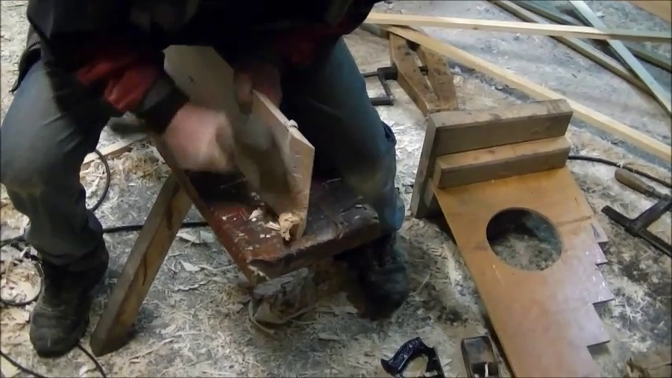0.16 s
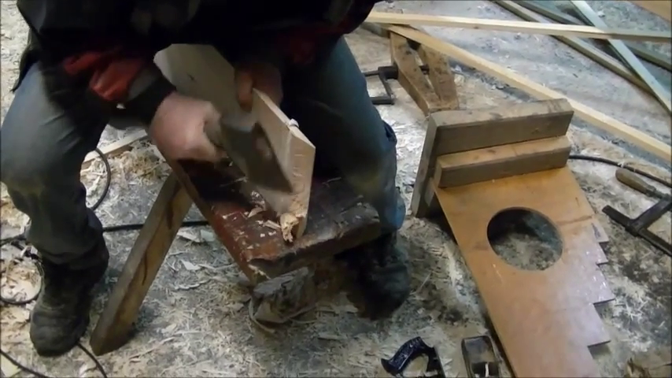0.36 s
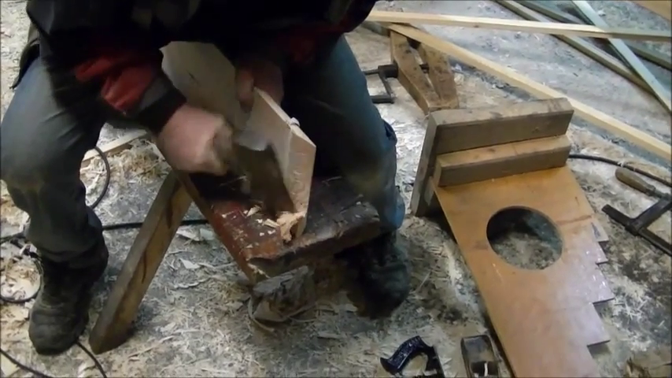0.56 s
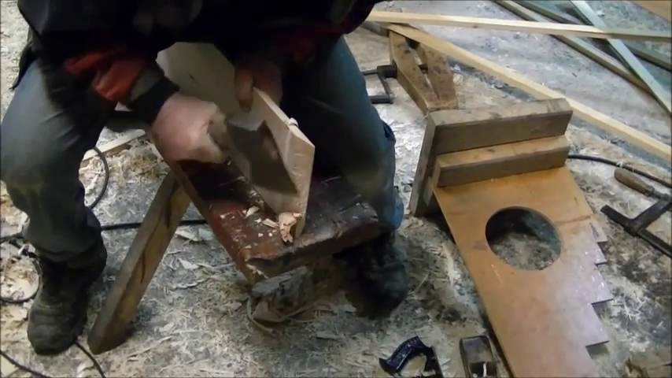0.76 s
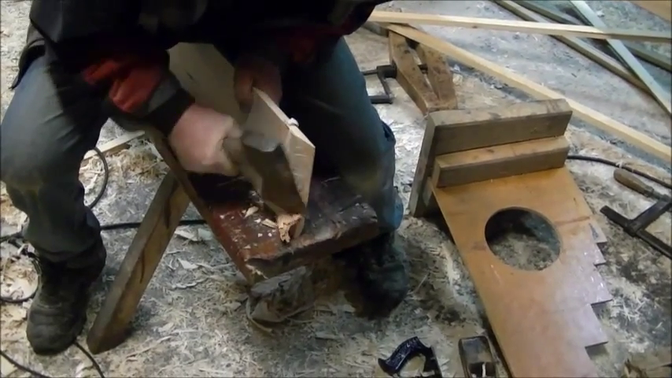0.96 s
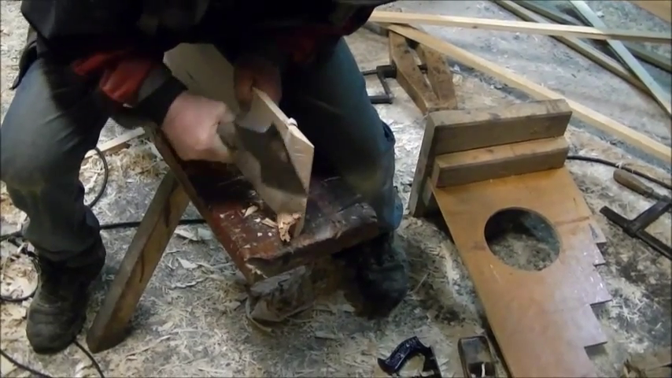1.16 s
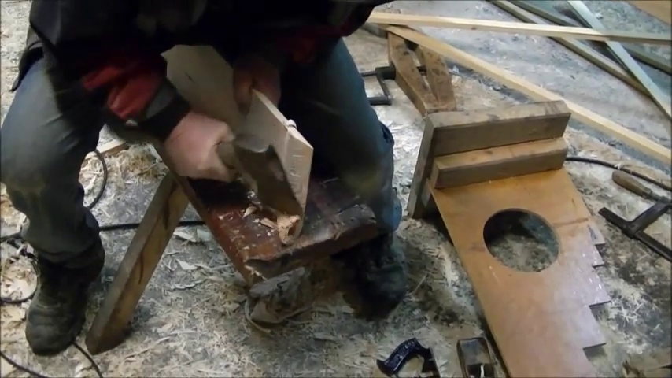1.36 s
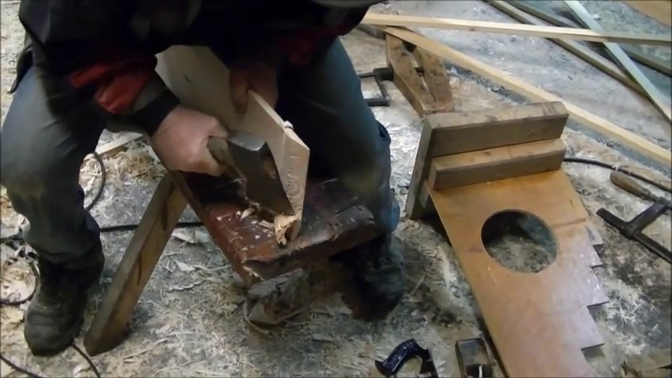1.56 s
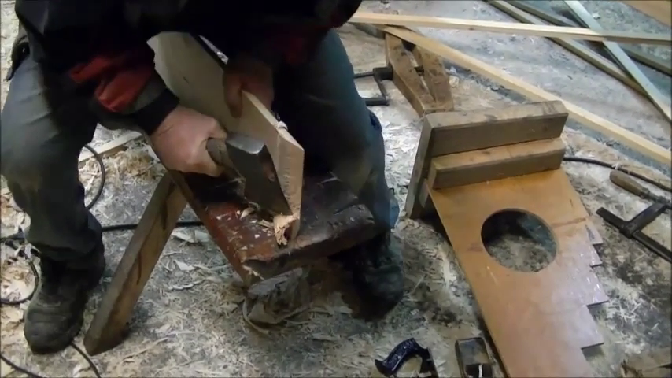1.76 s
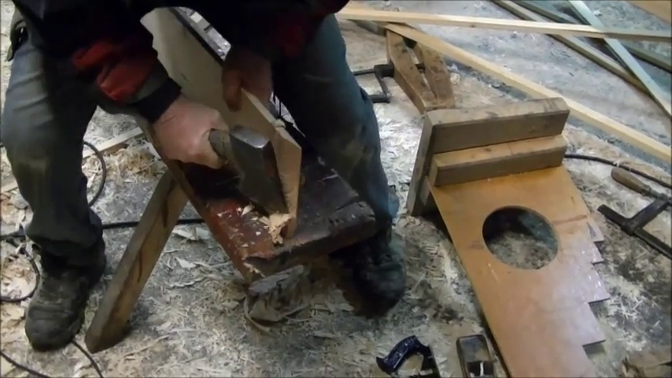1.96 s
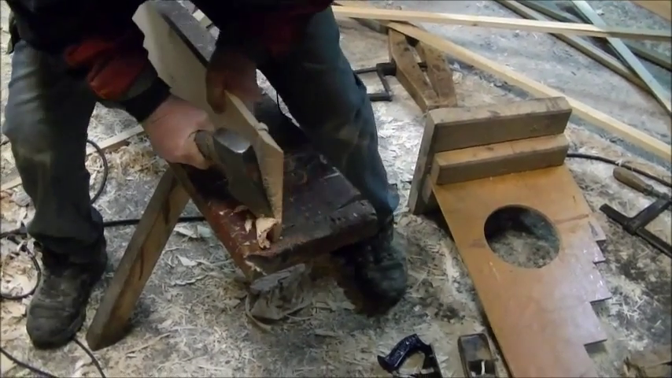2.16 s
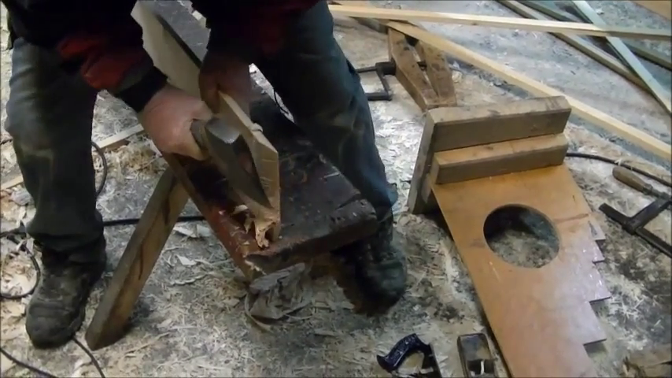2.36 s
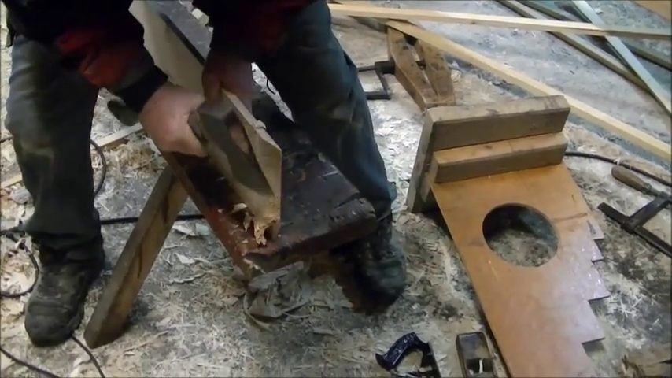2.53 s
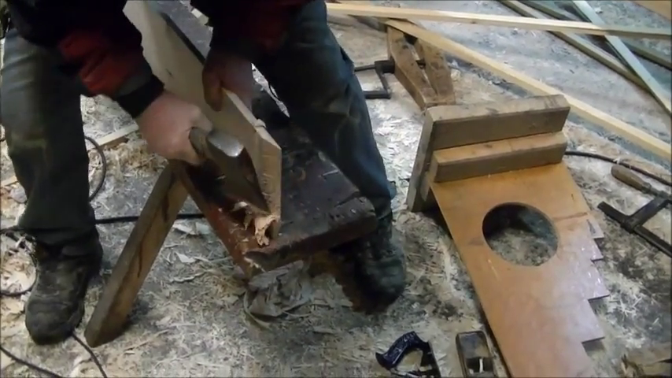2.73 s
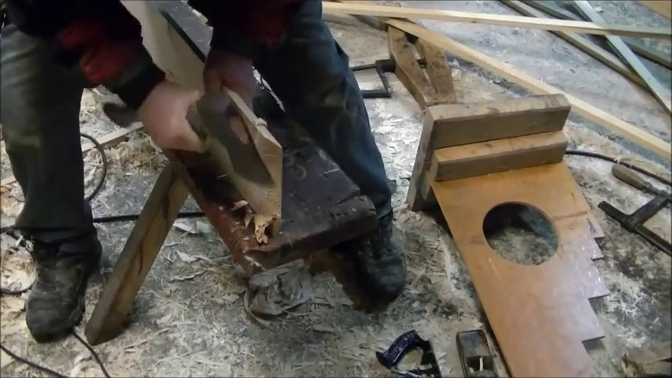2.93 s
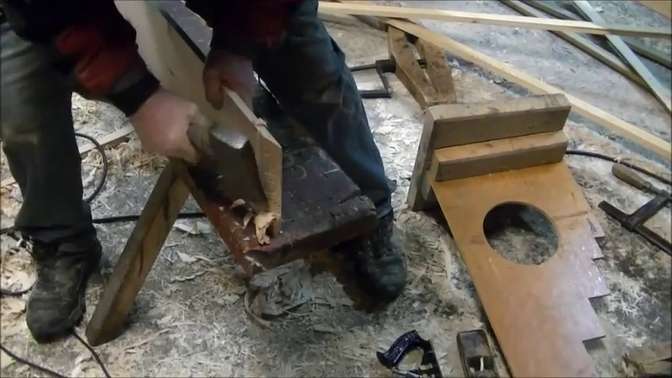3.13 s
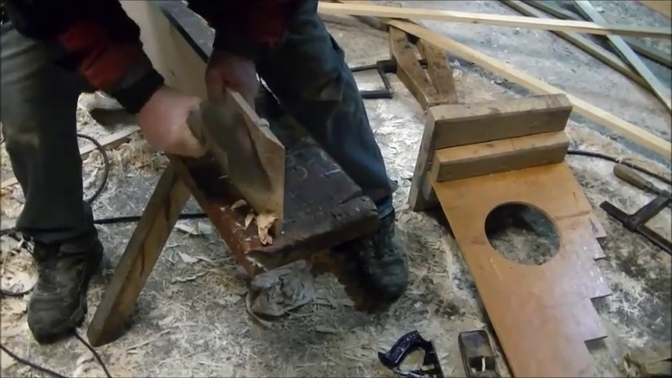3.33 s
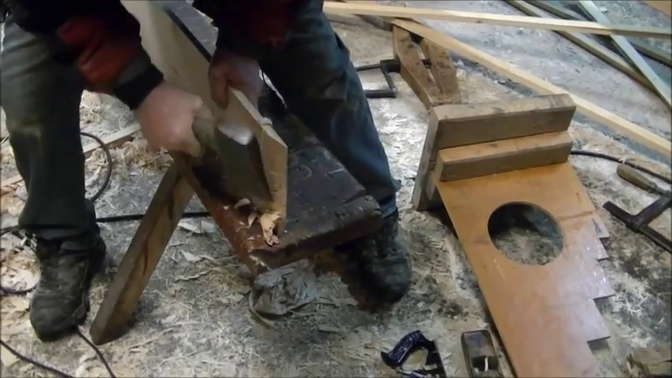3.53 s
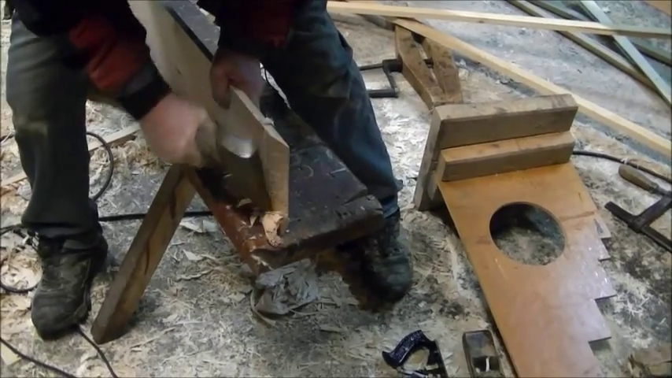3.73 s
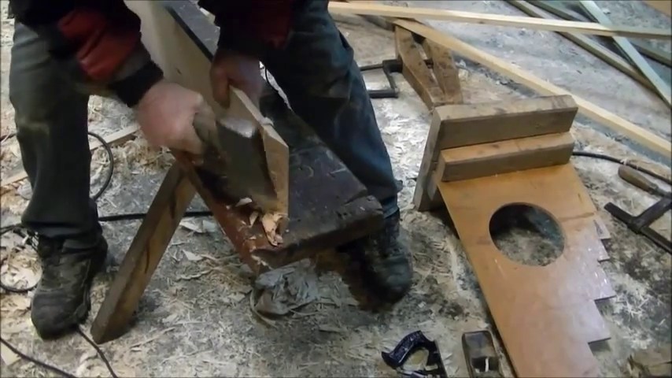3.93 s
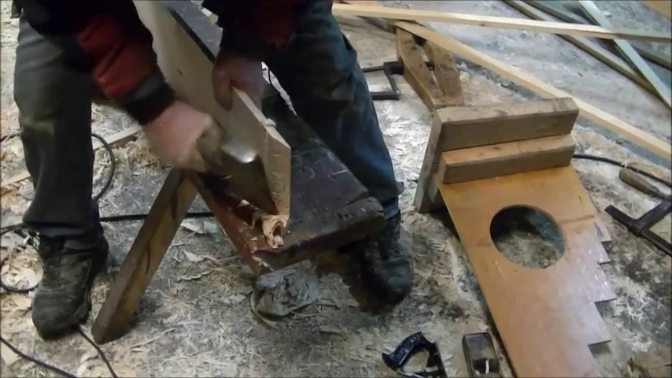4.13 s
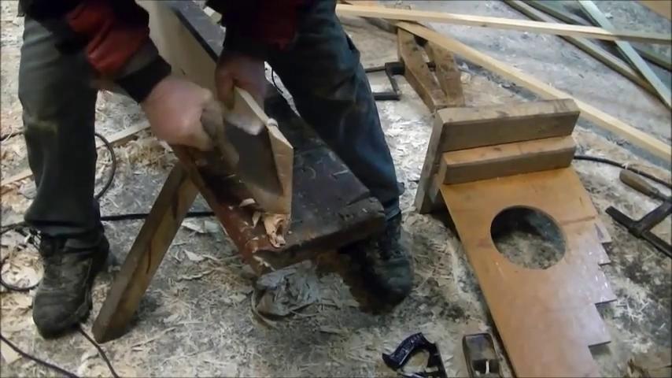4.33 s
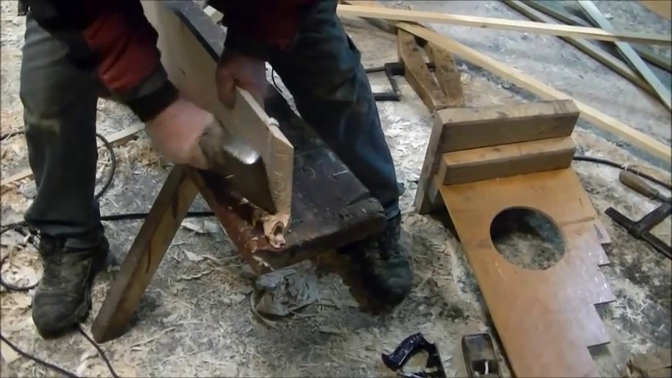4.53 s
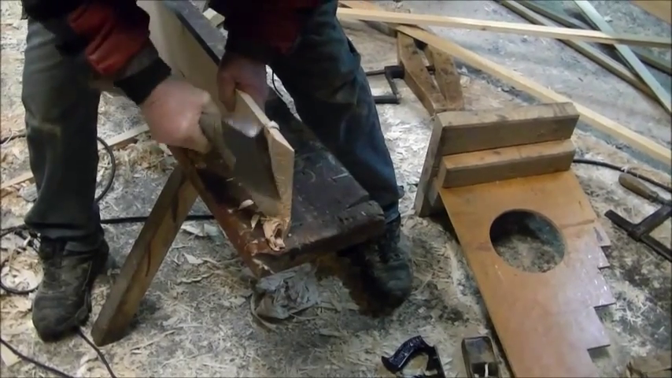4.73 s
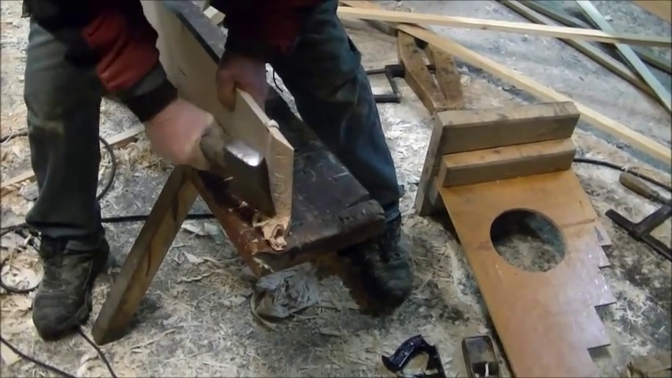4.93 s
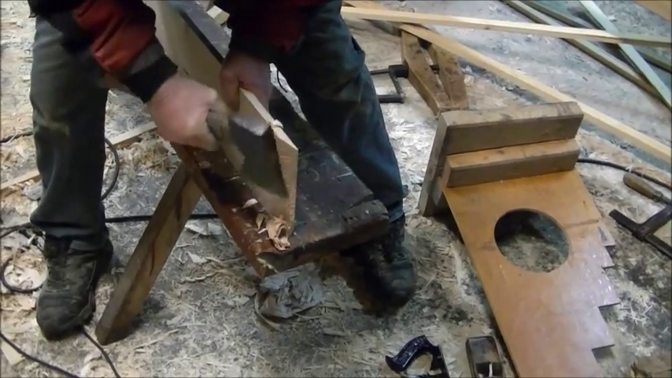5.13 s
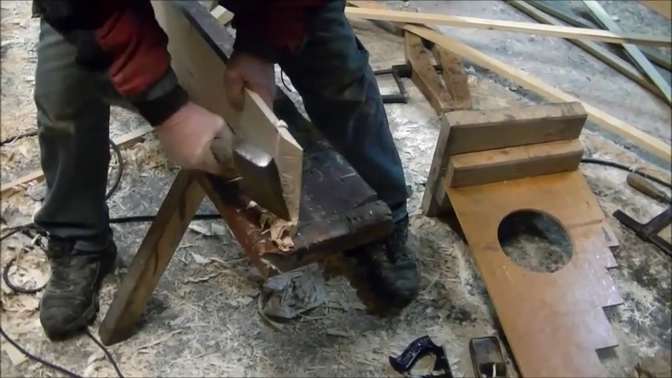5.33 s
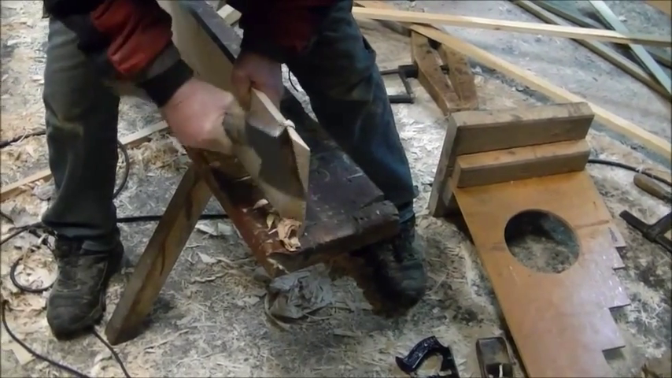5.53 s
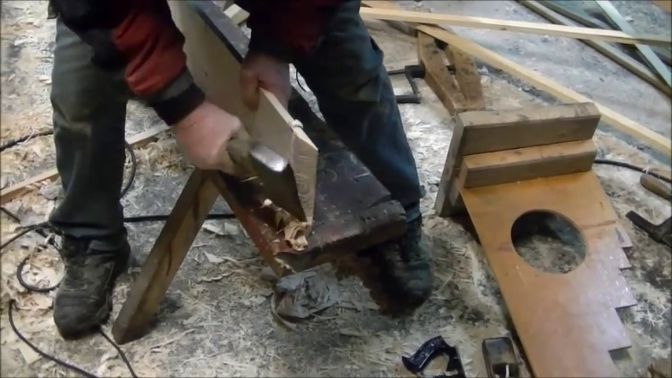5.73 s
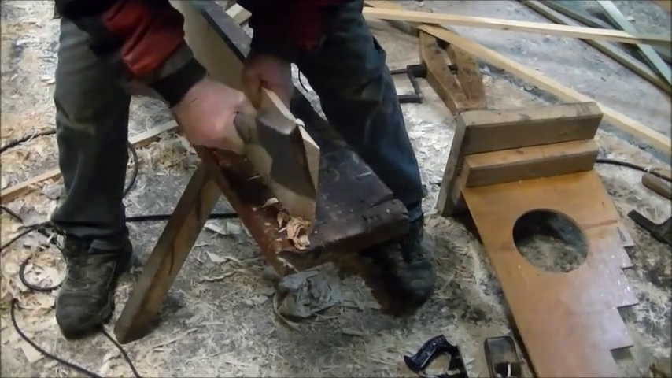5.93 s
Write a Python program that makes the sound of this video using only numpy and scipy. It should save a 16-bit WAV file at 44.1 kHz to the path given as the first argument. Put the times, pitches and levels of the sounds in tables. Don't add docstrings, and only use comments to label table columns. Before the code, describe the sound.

In a large, echoing workshop a hand axe chops a plank on a low wooden block. Five hard knocks come about every 0.4 seconds, with tearing fibres and block thuds; after a pause with the plank scraping, the steady chopping resumes to the end. Close stereo microphone, loud and slightly squashed, with gain dipping at each blow.

```python
import sys
import numpy as np
from scipy import signal
from scipy.fft import rfft, irfft
from scipy.io import wavfile
from scipy.ndimage import uniform_filter1d

SR = 44100
rng = np.random.default_rng(int(sys.argv[2]) if len(sys.argv) > 2 else 0)


def amplitude_ratio(level_db):
    exponent = np.asarray(level_db, float) / 20
    return 10 ** exponent


def master_out(mix):
    frames = np.transpose(np.atleast_2d(mix))
    ceiling = np.clip(frames, -1, 1)
    pcm = np.round(ceiling * 32767).astype(np.int16)
    wavfile.write(sys.argv[1], SR, pcm)


N = 268128
LEAD = SR // 2
T = (np.arange(N + LEAD) - LEAD) / SR
BUILD_S = 0.007

# (first touch t/s, block level/dB, plank level/dB, fibre level/dB)
BLOWS = [(-.16, -1.5, -2, 9.5), (.228, 4, 3.5, 4.5), (.613, -0.5, 5, 0.5), (1.0184, -4.5, 4.5, 6.5),
         (1.4038, 1, 4.5, 0.5), (2.647, 1.5, 2, 3.5), (3.0384, 6, 3, -3), (3.4217, 3.5, -2, 5),
         (3.7844, -2.5, 3, 4), (4.1699, 2, 1.5, 12), (4.5459, 3, -5.5, 0), (4.9325, 7, -0.5, 2.5),
         (5.3453, -3.5, -6, 3), (5.7343, 3.5, -9.5, -2.5)]
# (length/s, hiss/dB, body/dB, gain duck/dB)
TEARS = [(0.0023, -38.5, -4.5, 14), (0.003, -33.5, -10, 18), (0.0063, -30, -11, 13.5), (0.0014, -34, 0, 13),
         (0.006, -29, -10, 9), (0.0036, -34, -10.5, 11.5), (0.0051, -25.5, -17.5, 10), (0.0058, -36, -6, 7),
         (0.0033, -26.5, -5.5, 13), (0.024, -31.5, -15, 4.5), (0.0085, -44, -10, 8),
         (0.011, -25, -15.5, 1.5), (0.0046, -24, -9.5, 2.5)]
# (t/s, scrape level/dB, sleeve rustle level/dB)
SHIFT = [
    (1.866, -41.5, -59),
    (2.032, -33.5, -48),
    (2.09, -43, -59),
    (2.14, -33, -50),
    (2.255, -44, -53),
]
# (f/Hz, t60/s)
T60 = [(60, 0.61), (260, 1.05), (700, 0.88), (1800, 0.81), (4800, 0.53), (9000, 0.4), (16000, 0.29)]


def rms_one(x):
    return x / np.sqrt(np.mean(x ** 2) + 1e-20)


def at_hz(points, hz):
    table_hz, value = np.transpose(points)
    return np.interp(np.log(hz), np.log(np.maximum(table_hz, 1)), value)


def band(x, low_hz, high_hz, order=2):
    edges_hz = [low_hz, min(high_hz, 0.45 * SR)]
    return signal.sosfilt(signal.butter(order, edges_hz, "band", fs=SR, output="sos"), x)


def resonance(x, hz, width_hz):
    r = np.exp(-np.pi * width_hz / SR)
    zeros = np.array([1, 0, -1]) * (1 - r * r) / 2
    return signal.lfilter(zeros, [1, -2 * r * np.cos(2 * np.pi * hz / SR), r * r], x)


def add(out, s, sound):
    i = round(s * SR) + LEAD
    out[i:i + len(sound)] += sound[:len(out) - i]


def colour_db(hz):
    colour_hz = [260, 1500, 8000]
    return np.array([np.interp(np.log(hz), np.log(colour_hz), levels_db) for _, *levels_db in BLOWS])


def blow_clicks(levels):
    clicks = np.full(len(T), 1e-18)
    clicks[[round(s * SR) + LEAD for s, *_ in BLOWS]] = levels
    return clicks


def dying(levels, t60_s):
    arrive = np.exp(-1 / (BUILD_S * SR))
    energy = signal.lfilter([1], [1, -amplitude_ratio(-120 / (t60_s * SR))], blow_clicks(levels ** 2))
    return np.sqrt(signal.lfilter([1 - arrive], [1, -arrive], energy))


def stereo_bands():
    # (f/Hz, correlation)
    likeness = [(60, 0.25), (130, 1), (290, 0.77), (640, 0.61), (1410, -0.17), (3100, -0.35), (6820, -1.36),
                (15000, 0.46)]
    # (f/Hz, level/dB)
    lean = [(60, 4.5), (240, 2), (950, -1.5), (3770, -1), (15000, 3.5)]
    edges_hz = 28 * 2 ** np.arange(0, 9.4, 1 / 3)
    white = rng.standard_normal((2, 2, len(T)))
    for k, (low_hz, high_hz) in enumerate(zip(edges_hz, edges_hz[1:])):
        mid, side = band(white[k % 2], low_hz, high_hz, order=3)
        hz = np.sqrt(low_hz * high_hz)
        alike = np.clip(at_hz(likeness, hz), 0, 1)
        half_lean_db = at_hz(lean, hz) / 2
        pair = np.sqrt(1 + alike) * mid + np.sqrt(1 - alike) * side * [[1], [-1]]
        yield hz, pair * amplitude_ratio(np.array([[half_lean_db], [-half_lean_db]]))


def shop():
    # (f/Hz, level/dB per Hz)
    tail = [(28, -61), (60, -22.5), (110, -21.5), (165, -3.5), (260, 2), (420, -1), (760, 0), (950, -9),
            (1400, -3), (2100, -12), (2550, -19), (4300, -31.5), (5800, -42.5), (10000, -48.5),
            (16300, -76)]
    # (f/Hz, level/dB per Hz)
    air = [(24, -49), (40, 11), (216, -5.5), (300, -4), (367, -0.5), (2820, -5), (5160, -13.5),
           (10700, -19.5), (15200, -26), (16400, -36)]
    tail_db, air_db, flutter_db = -12.5, -46, 1
    flutter = amplitude_ratio(flutter_db * rms_one(band(rng.standard_normal(len(T)), 11.5, 160)))
    out = 0
    for hz, noise in stereo_bands():
        t60_s = at_hz(T60, hz)
        fill_db = tail_db + at_hz(tail, hz) + colour_db(hz) + 60 * 0.2 / t60_s
        echo = dying(amplitude_ratio(fill_db), t60_s) * flutter
        out = out + noise * np.hypot(echo, amplitude_ratio(air_db + at_hz(air, hz)))
    return out


def timbers():
    # (f/Hz, width/Hz, level/dB, t60/s)
    modes = [(251.6, 27, -12, 0.51), (984, 30, -19, 0.87), (1189, 14, -15.5, 0.72), (1300, 15, -16, 0.75),
             (1399, 61, -15, 0.77), (1529, 63, -16.5, 0.7), (2027, 52, -21, 0.71), (534.4, 47, -17.5, 0.54),
             (736.6, 29, -20.5, 1), (926, 27, -14.5, 0.43), (1080, 25, -22.5, 0.91), (1796, 51, -28, 0.55),
             (2870, 100, -32, 0.72), (4100, 110, -35, 0.34)]
    ring_db, luck_db = -7.5, 1.8
    white = rng.standard_normal(len(T))
    lucks_db = rng.normal(0, luck_db, (len(modes), len(BLOWS)))
    out = 0
    for (hz, width_hz, level_db, t60_s), luck in zip(modes, lucks_db):
        line = rms_one(resonance(resonance(white, hz, width_hz), hz, width_hz))
        out = out + line * dying(amplitude_ratio(ring_db + level_db + colour_db(hz) + luck), t60_s)
    return out


def plank_in_shop():
    # (f/Hz, width/Hz, level/dB)
    ranges = [(724, 180, -18), (1850, 240, -12.5), (1850, 170, -13.5), (2010, 510, -11.5), (3120, 340, -22),
              (1370, 790, -17.5), (543, 200, -13.5), (2020, 420, -21), (2230, 560, -15.5),
              (2000, 2800, -22), (2100, 110, -45), (2050, 720, -17), (1360, 180, -42), (674, 60, -17.5)]
    out = np.zeros((2, len(T)))
    t = np.arange(30000) / SR
    chance = rng.standard_normal((len(ranges), 3, len(t)))
    for (s, *_), (hz, width_hz, level_db), white in zip(BLOWS, ranges, chance):
        pair = white[:2] + 0.96 * white[2]
        noise = rms_one(band(pair, hz - width_hz / 2, hz + width_hz / 2, order=3))
        shape = np.sqrt(1 - np.exp(-t / BUILD_S)) * amplitude_ratio(level_db - 60 * t / at_hz(T60, hz))
        for side, sound in zip(out, noise * shape):
            add(side, s, sound)
    return out


def rings(events, cycles, rise, noisy, crack_db):
    out = np.zeros(len(T))
    chance = rng.standard_normal((len(events), 2, 2500))
    for (s, peak_db, hz), (grit, white) in zip(events, chance):
        n = np.arange(len(grit))
        turns = n * hz / SR
        shape = (1 - np.exp(-turns / rise)) * amplitude_ratio(-60 * turns / cycles)
        tone = np.sin(2 * np.pi * turns) + noisy * rms_one(band(grit, hz * 0.81, hz * 1.095))
        crack = amplitude_ratio(crack_db - n * 60 / (0.0016 * SR)) * band(white, 2700, 4500 + hz * 1.6)
        add(out, s, amplitude_ratio(peak_db) * (tone * shape / shape.max() + crack))
    return out


def chips():
    # (t/s, peak level/dB, f/Hz)
    ticks = [
        (0.077, -40, 10200),
        (0.85, -45, 5200),
        (1.6147, -49, 10900),
        (1.6746, -43, 9800),
        (2.158, -44, 9150),
        (2.2575, -37, 7600),
        (2.2742, -44, 8900),
        (2.3344, -48, 10400),
        (3.366, -49, 11500),
    ]
    return rings(ticks, cycles=100, rise=0.61, noisy=0.98, crack_db=2)


def tugs(peaks_db, fall_db_per_s):
    rise_db_per_s, linger_db, linger_db_per_s = 192, -5.5, 59
    since = T - np.transpose(SHIFT)[0][:, None]
    fall_db = np.maximum(-fall_db_per_s * since, linger_db - linger_db_per_s * since)
    shape_db = np.where(since < 0, rise_db_per_s * since, fall_db)
    return np.sqrt(np.sum(amplitude_ratio(peaks_db[:, None] + shape_db) ** 2, axis=0))


def shifting():
    # (f/Hz, width/Hz, level/dB)
    modes = [(175.6, 4.7, 5.5), (256, 37, 8), (447, 210, 5.5), (736, 330, 4.5), (1300, 310, 4),
             (2320, 90, -32)]
    swing_db, swing_s = -59, 0.039
    _, scrape_db, rustle_db = np.transpose(SHIFT)
    lumps = amplitude_ratio(1.75 * rms_one(band(rng.standard_normal(len(T)), 27, 50)))
    grit = rng.standard_normal((3, len(T))) * lumps
    wood = 0
    for hz, width_hz, level_db in modes:
        wood = wood + amplitude_ratio(level_db) * resonance(grit[:2] + grit[2], hz, width_hz) / np.sqrt(width_hz)
    wood = rms_one(band(wood, 160, 2400))

    grit = grit * amplitude_ratio(2 * rms_one(band(rng.standard_normal(len(T)), 40, 300)))
    rub = band(band(grit[:2] + 0.5 * grit[2], 6700, 12600), 7400, 13300)
    cloth = rms_one(rub + 0.48 * band(grit[:2], 4300, 16000))
    starts_s = [s for s, *_ in BLOWS] + [6.1]
    swing = amplitude_ratio(swing_db) * sum(np.exp(-((T - s + 0.031) / swing_s) ** 2) for s in starts_s)
    return tugs(scrape_db, 123) * wood + (tugs(rustle_db, 259) + swing) * cloth


def cuts():
    return [(s, *tear) for (s, *_), tear in zip(BLOWS[1:], TEARS)]


def tearing():
    out = np.zeros(len(T))
    chance = rng.standard_normal((len(TEARS), 2, 2000))
    early_s = 0.004
    t = np.arange(2000) / SR - early_s
    for (s, length_s, hiss_db, body_db, _), (grit, size) in zip(cuts(), chance):
        fade = np.exp(np.minimum((length_s - t) / 0.0045, 0))
        grains = rms_one(grit * amplitude_ratio(0.96 * size))
        bright = band(band(grains, 7300, 13000), 7300, 13000)
        hiss = rms_one(bright + 0.25 * band(grains, 2800, 5400))
        body = rms_one(band(grains, 395, 2560))
        add(out, s - early_s, amplitude_ratio(hiss_db) * fade * np.exp(np.minimum(t / 0.0005, 0)) * hiss)
        add(out, s - early_s, amplitude_ratio(body_db - 6) * fade * np.clip(t / 0.002, 0, 1) * body)
    return out


def chatter(count=3):
    level_db, spread_db, centre_hz, cut_lengths = -12, 17, 1550, 3.4
    events = []
    for s, length_s, _, body_db, _ in cuts():
        for when, size, pitch in rng.random((count, 3)):
            at_s = s + 0.00179 + cut_lengths * length_s * when
            peak_db = body_db + level_db - 2 * spread_db * size
            events.append((at_s, peak_db, centre_hz * (0.8 + 0.4 * pitch)))
    return events


def knocks():
    # (t/s, peak level/dB as heard, f/Hz)
    bites = [(.2281, 1.5, 1550), (.2364, 0.5, 1480), (.614, 3, 1670), (.6223, 4, 1490), (1.0279, 4, 1580),
             (1.4065, -2.5, 2030), (1.4151, -3.5, 1380), (2.6479, -4, 1590), (2.6579, -1, 1300),
             (3.0401, -2.5, 2050), (3.0482, 0, 1280), (3.4217, -4.5, 1970), (3.430, -16, 1570),
             (3.7865, 0, 1850), (3.7924, -3, 1850), (4.1703, -1, 2210), (4.5552, -6, 1370),
             (4.5634, -2, 1350), (4.9359, -4, 2150), (4.9418, 3, 1800), (5.3446, -11, 1790),
             (5.3514, -2.5, 1360), (5.7343, -16, 1780), (5.7455, -20, 1920)]
    return rings(bites + chatter(), cycles=10, rise=0.2, noisy=0.26, crack_db=-4)


def snaps():
    # (t/s, peak level/dB as heard)
    breaks = [(.228, -22.5), (0.238, -26), (0.612, -39), (1.0196, -13.5), (1.405, -26), (1.4082, -18),
              (2.647, -29), (2.65, -10.5), (3.0375, -15.5), (3.423, -10), (3.7844, -15), (3.789, -19),
              (4.1713, -7), (4.5554, -25), (4.5607, -19.5), (4.9339, -14), (4.946, -16), (4.9485, -17),
              (5.3505, -16), (5.3554, -22), (5.7352, -33), (5.738, -14)]
    centre_hz, spread = 9800, 0.041
    events = [(s, db, centre_hz * (1 + spread * rng.standard_normal())) for s, db in breaks]
    return rings(events, cycles=55, rise=0.13, noisy=1.3, crack_db=-20)


def rocking(count=3):
    # (t/s, push level/dB as heard, rocking level/dB, rock spacing/s, rocking f/Hz)
    pushes = [(0.241, -11.5, -34, .03, 300), (0.628, -19, -23, .03, 298), (1.032, -21, -22, 0.028, 300),
              (1.408, -12, -18.5, 0.033, 307), (2.655, -10, -11, 0.042, 254), (3.041, -7.5, -6, 0.013, 473),
              (3.425, -22.5, -33, .03, 304), (3.796, -39, -12.5, 0.035, 293), (4.193, -16, -20, 0.034, 327),
              (4.563, -14, -8.5, .017, 320), (4.964, -7, -10, 0.026, 325), (5.349, -13, -35, .03, 297),
              (5.753, -7.5, -7.5, 0.024, 273)]
    block_hz, spread, rock_loss_db = 271, 0.063, 4
    events = []
    for s, push_db, rock_db, gap_s, rock_hz in pushes:
        pitch = 1 + spread * rng.standard_normal(count + 1)
        events.append((s, push_db, block_hz * pitch[0]))
        for k in range(1, count + 1):
            events.append((s + k * gap_s, rock_db - rock_loss_db * (k - 1), rock_hz * pitch[k]))
    return events


def thuds():
    return rings(rocking(), cycles=15.8, rise=0.68, noisy=0.3, crack_db=-41.5)


def duck_db():
    release_s, release_shape = 0.093, 2.07
    out = np.zeros(len(T))
    for s, *_, depth_db in cuts():
        i = round(s * SR) + LEAD
        since = T[i:i + LEAD] - T[i]
        out[i:i + LEAD] += depth_db * np.exp(-(since / release_s) ** release_shape)
    return uniform_filter1d(out, size=40)


def axe():
    return (knocks() + snaps() + thuds() + tearing()) * amplitude_ratio(duck_db()) + chips()


def ports(x):
    # (f/Hz, left lead/rad)
    lead = [(0, 0), (1200, .2), (5000, 1.3), (6400, 4.4), (9000, 5.5), (16500, 5.2)]
    hz = np.arange(len(x) // 2 + 1) * SR / len(x)
    lag = np.exp(-1j * np.interp(hz, *np.transpose(lead)))
    late = irfft(rfft(x) * lag, len(x))
    return np.array([x * amplitude_ratio(2.5), late * amplitude_ratio(0.5)])


def scene():
    near = ports(axe() + timbers())
    return (near + shop() + plank_in_shop() + shifting())[:, LEAD:]


def band_limit(x):
    return signal.sosfilt(signal.butter(12, 16590, fs=SR, output="sos"), x)


def record(dry):
    thin = signal.sosfilt(signal.butter(2, 110, "high", fs=SR, output="sos"), dry)
    level = np.abs(thin) * amplitude_ratio(-duck_db()[LEAD:])
    held = np.sqrt(np.tanh(level ** 2)) * np.sign(thin) * 0.93
    mix = signal.sosfilt(signal.cheby2(8, 40, 16700, fs=SR, output="sos"), held)
    return band_limit(mix)


dry = scene()
out = record(dry)
master_out(out)
```